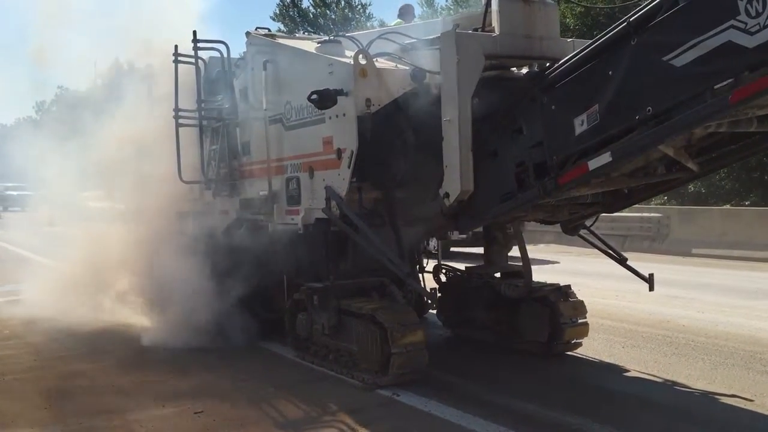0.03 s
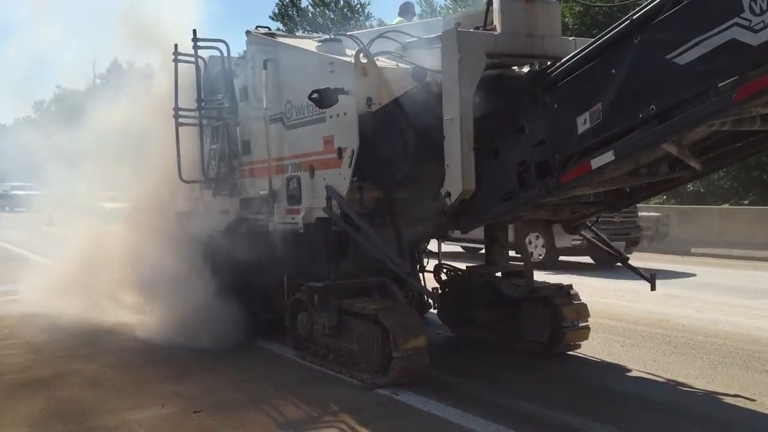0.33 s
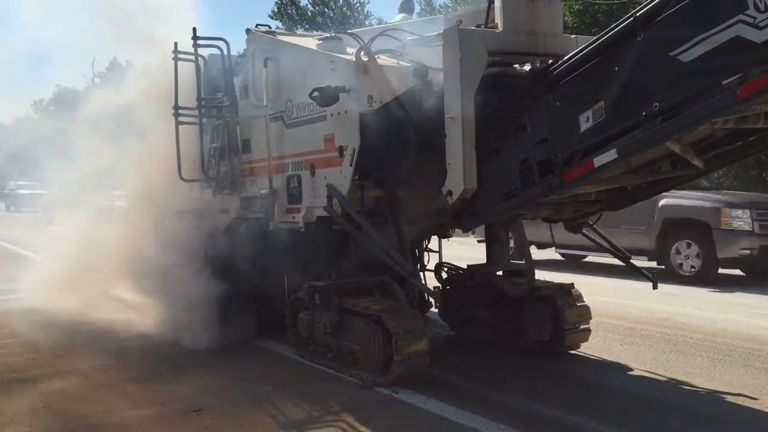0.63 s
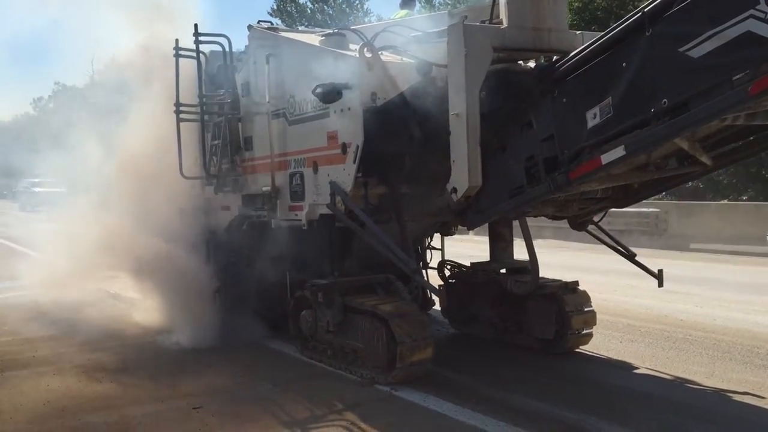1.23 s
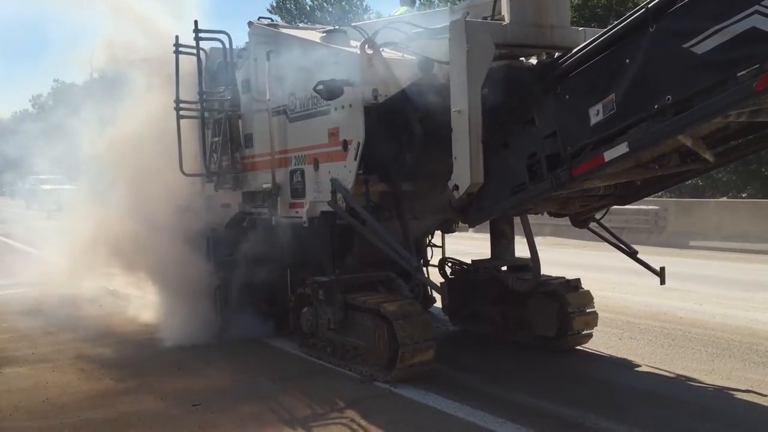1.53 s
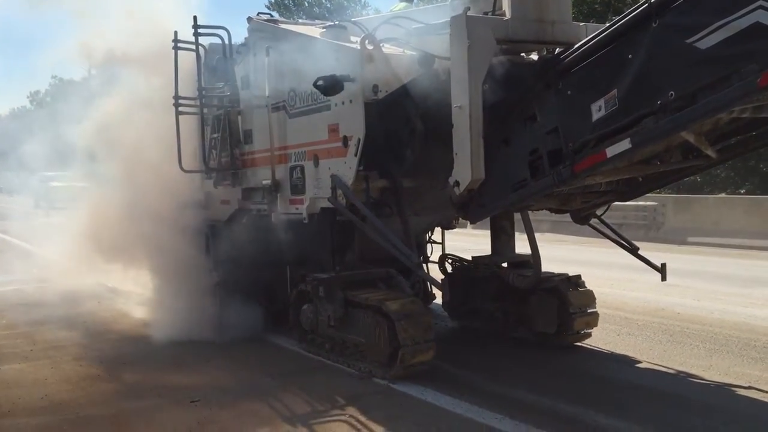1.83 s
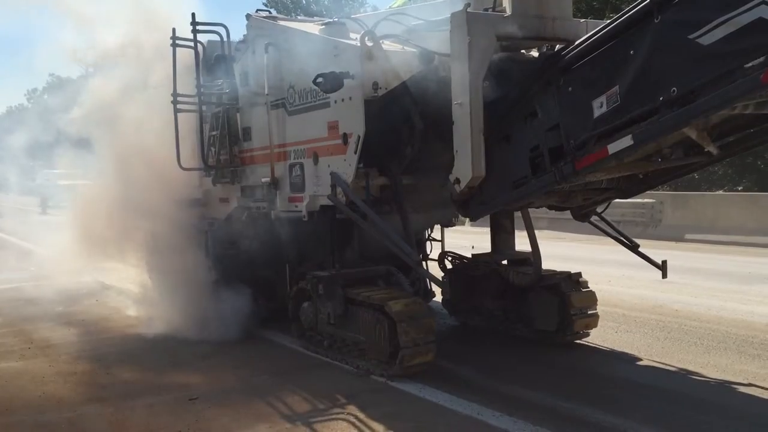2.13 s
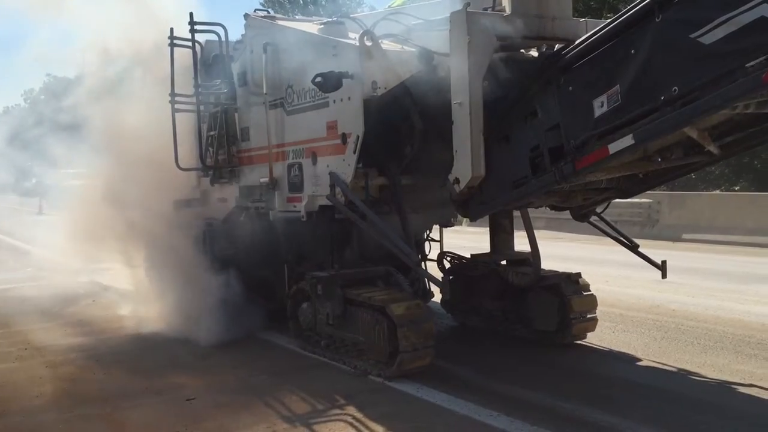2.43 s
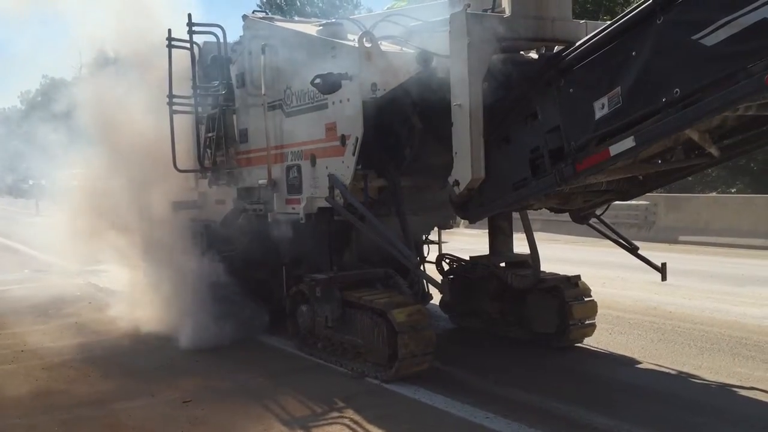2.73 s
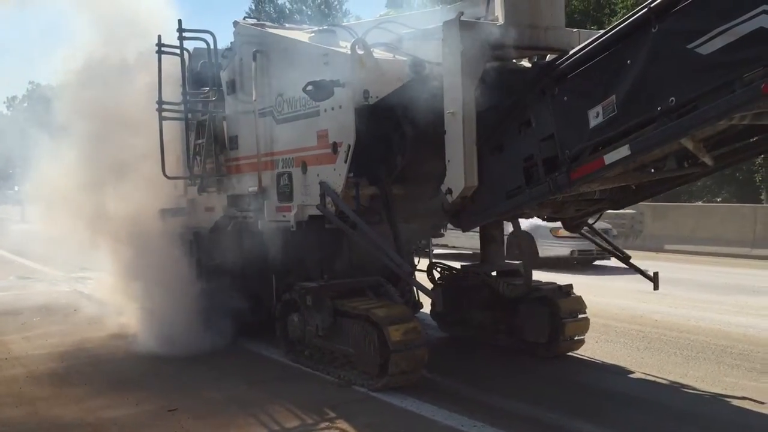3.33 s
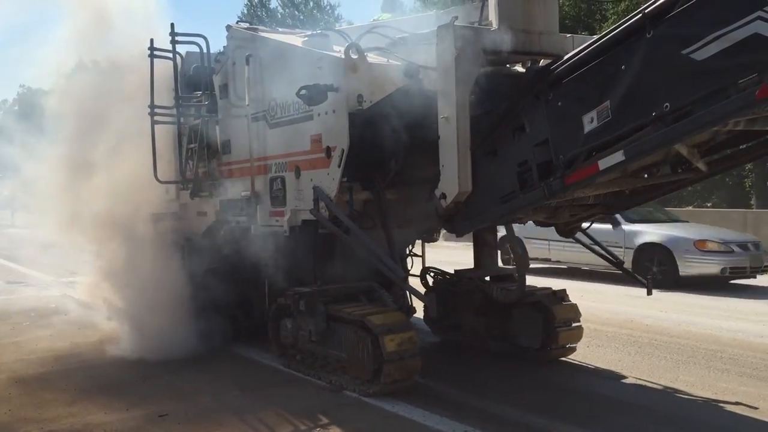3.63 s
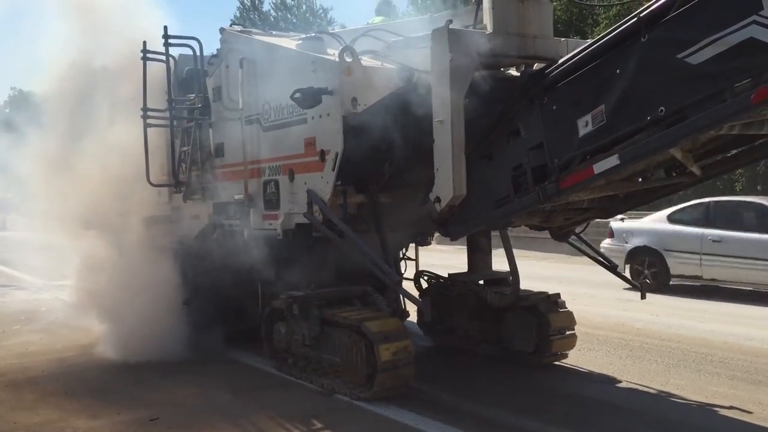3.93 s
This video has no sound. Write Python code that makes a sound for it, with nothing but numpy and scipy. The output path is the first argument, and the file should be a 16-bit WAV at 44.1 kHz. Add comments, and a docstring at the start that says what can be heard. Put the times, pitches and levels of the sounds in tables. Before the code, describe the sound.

Road milling machine rumbling and grinding nearby, with a diesel drone and rattling grit.

```python
"""On a road beside an open traffic lane, a milling machine works steadily a few metres away.
Its diesel engine and cooling fan drone through a heavy rumble. Steel picks on a spinning drum
grind the asphalt and make the drum's housing ring. Grit rattles up a conveyor belt,
the hydraulics whine faintly, and two vehicles roll past behind the machine on roaring tyres."""
import sys
import numpy as np
from scipy import signal
from scipy.fft import rfft, irfft
from scipy.io import wavfile
from scipy.ndimage import uniform_filter1d, minimum_filter1d

SR = 44100
rng = np.random.default_rng(int(sys.argv[2]) if len(sys.argv) > 2 else 0)


def log_audio(samples):
    """Write samples as a 16-bit WAV file to the path given in sys.argv[1]."""
    # one column per channel
    frames = np.atleast_2d(samples).T
    # limit to full scale, then quantise
    limited = np.clip(frames, -1, 1)
    pcm = np.round(limited * 32767).astype(np.int16)
    wavfile.write(sys.argv[1], SR, pcm)


N = 176400  # 4 seconds

# The engine's tones. Each entry: vibrations per engine cycle (two turns of the crank).
ENGINE_ORDERS = [4, 6, 7, 9, 10, 12, 14, 16, 20, 21, 22]
# Each entry: the base level of the matching tone in dB.
ENGINE_DB = [-40.5, -26.5, -37.5, -39, -39, -41, -35, -40, -41.5, -41.5, -42]
# Hums of the fan, belts and drum drive. Each entry: pitch in Hz.
HUM_PITCHES = [37.3, 48.3, 68.0, 123.5, 142.6]
# Each row: the matching hum's level in dB, its unsteadiness from 0 to 1.
HUM_LEVELS = [(-44, .1), (-38.5, 0.4), (-33.5, 0.35), (-33.5, .6), (-24.5, 0.15)]
# Pumps and gears. Each row: pitch in Hz, level in dB, pitch wander in Hz.
PUMP_WHINES = [(403, -42.5, 2.6), (1355, -50.5, 5.3), (1387, -50.5, 5.5), (2330, -50, 6.8), (2344, -54, 5)]

# How sounds rise and fall; swell() softens these curves. Each row: time in seconds, relative level in dB.
ENGINE_LOAD = [(0, -31.5), (.4, -27), (.95, -28), (1.3, -24.5), (1.7, -26), (2.7, -24), (3.0, -25),
               (3.2, -23), (3.42, -18), (3.58, -30), (3.82, -20), (4, -22)]
RUMBLE_CURVE = [(0.0, -16.5), (0.18, -19), (.36, -15), (.62, -18.5), (0.72, -18.5), (1.0, -17),
                (1.25, -19.5), (1.64, -17.5), (1.92, -18), (2.33, -18), (2.73, -18.5), (3.07, -19),
                (3.2, -16), (3.45, -25.5), (3.61, -18.5), (4.0, -21)]
SHUDDER_CURVE = [(0.0, -23.5), (0.24, -38.5), (0.6, -18), (0.88, -24.5), (1.04, -24), (1.36, -24.5),
                 (1.52, -20.5), (1.76, -21.5), (2.21, -25), (2.49, -26), (2.73, -26), (2.97, -32),
                 (3.13, -24), (3.37, -24.5), (3.77, -29), (4.0, -33)]
DRUM_BITE = [(0.0, -25), (0.12, -26.5), (0.36, -27.5), (0.96, -26.5), (1.16, -26.5), (1.36, -26.5),
             (1.48, -25.5), (1.6, -26), (1.84, -25), (1.96, -26.5), (2.09, -24.5), (2.41, -26), (2.81, -27),
             (3.01, -25), (3.41, -27.5), (3.57, -28), (3.89, -26.5), (4.0, -25)]
GRIT_CURVE = [(0.0, -36), (0.42, -35.5), (0.84, -37.5), (1.05, -36.5), (1.58, -35.5), (1.78, -37),
              (2.07, -36), (2.8, -36.5), (3.28, -36.5), (3.61, -37), (3.85, -36.5), (4.0, -36.5)]
FRAME_CURVE = [(0, -61), (.85, -62), (1.7, -59.5), (2.15, -60.5), (2.9, -60.5), (4, -59)]

# How much bass and treble each noise has. Each row: frequency in Hz, relative level in dB.
RUMBLE_COLOUR = [(30, -36.5), (84, -14), (95, 0), (122, 1), (156, 1.5), (215, -1.5), (232, -4), (255, -3.5),
                 (315, -3), (410, -5.5), (480, -13.5), (620, -28), (1200, -70.5), (4000, -110)]
SHUDDER_COLOUR = [(15, -38), (31, -25), (45, -8.5), (60, -0.5), (74, 5.5), (84, 2), (110, -19.5),
                  (200, -42), (800, -95)]
ASPHALT_COLOUR = [(200, -28), (480, -6), (580, -2.5), (680, 0.5), (800, -1.5), (960, 3), (1200, -2.5),
                  (1370, -4), (1470, -13), (1750, -10), (2100, -9), (2380, -11.5), (2650, -26.5),
                  (3300, -26.5), (4500, -44), (8000, -66), (12000, -85)]
GRIT_COLOUR = [(200, -41), (1000, -20.5), (2200, -1), (2950, 0.5), (3380, -2), (3720, -8), (4250, -5.5),
               (4600, -6.5), (4920, -11.5), (5500, -14.5), (6100, -15.5), (7500, -23.5), (9000, -29),
               (9900, -33), (10400, -38), (11050, -30), (11650, -35.5), (12100, -36), (12600, -43),
               (14300, -46.5), (15300, -48)]
PUFF_COLOUR = [(2000, -17), (7000, -1), (9500, 1), (12500, -8), (15000, -9)]

# Ringing steel. Each row: pitch in Hz, filter width in Hz, base level in dB.
HOUSING_RINGS = [(938, 66, -41.5), (1048, 155, -39.5)]
FRAME_RINGS = [(2566, 72, -57), (3613, 52, -56), (4320, 200, -62.5), (4520, 66, -63), (4580, 50, -61.5),
               (4790, 70, -65.5), (5080, 110, -63), (5360, 130, -61), (5610, 130, -60.5)]
PICK_RING = (2267, 280, -42)  # just one row

# Brief flurries. Each row: peak time in seconds, half-length in seconds, level in dB, pitch in Hz.
STONE_CRUNCHES = [(.05, 0.021, -26, 1000), (.28, .04, -28.5, 980), (.39, 0.033, -29, 990),
                  (.56, 0.043, -32.5, 1030), (1.17, 0.076, -30.5, 1060), (1.36, 0.042, -32.5, 1030),
                  (1.96, 0.03, -27.5, 980), (2.45, 0.081, -32, 1070), (3.54, .04, -29.5, 980)]
PICK_SKIDS = [(.06, .06, -38, 2320), (.25, 0.044, -37.5, 2260), (.63, .03, -38, 2280),
              (1.35, 0.13, -45, 2330), (1.8, 0.044, -40, 2270), (2.31, 0.029, -41, 2370),
              (2.96, 0.059, -41, 2370), (3.23, .08, -42, 2330), (3.795, .028, -36, 2310)]
# Vehicles. Each row: time when nearest in seconds, level in dB, half-length in seconds,
# tyre pitch in Hz, filter width in Hz.
VEHICLES = [(0.421, -32, 0.19, 570, 263), (3.62, -32.5, 0.12, 1033, 470)]

# Short swells. Each row: peak time in seconds, half-length in seconds, level in dB.
FRAME_CLATTERS = [(.35, .12, -2), (1.76, .05, 0), (2.43, .05, 0), (3.0, .09, 1), (3.35, .04, -1),
                  (3.5, .04, 2), (3.84, .05, 2)]  # level compared with the frame's steady ringing
HISS_PUFFS = [(.67, .06, -67), (1.19, .07, -73)]
DRUM_SURGES = [(.75, 0.06, -22.5), (1.22, 0.032, -24.5), (2.07, 0.029, -21), (2.35, 0.031, -18.5),
               (2.46, 0.037, -26.5), (2.65, 0.078, -23), (2.8, 0.043, -19), (3.17, 0.035, -24),
               (3.58, 0.05, -21.5)]
WHISTLE_RISES = [(1.75, 0.28, -77)]
# The drum's boom: pitch in Hz, then filter width in Hz.
DRUM_BOOM = (199, 160)
# The whistle: pitch in Hz, then pitch wander in Hz.
WHISTLE_PITCH = (8838, 14)


def amp(db):
    """Turns decibels into a number to multiply a sound by."""
    return 10 ** (np.asarray(db) / 20)


def unit(x):
    """Scales a signal so its average strength (rms) is 1."""
    return x / np.sqrt(np.mean(x ** 2) + 1e-20)


def seconds():
    """The time of each sample."""
    return np.arange(N) / SR


def swell(curve, depth):
    """A volume that follows a curve around its average; a depth below 1 shrinks the swings."""
    db = np.interp(seconds(), *np.transpose(curve))
    return amp(depth * (db - db.mean()))


def bump(peak_s, span_s, db):
    """A volume that rises smoothly to a peak and falls away again."""
    return amp(db) * np.exp(-.5 * ((seconds() - peak_s) / span_s) ** 2)


def bumps(rows):
    """The combined volume of several bumps."""
    return np.sqrt(sum(bump(*row) ** 2 for row in rows))


def drift(rate_hz):
    """A random wobble of strength 1, mostly slower than rate_hz."""
    hz = np.fft.rfftfreq(N, 1 / SR)
    spectrum = rfft(rng.standard_normal(N)) * (hz > 0)
    return unit(irfft(spectrum / (1 + (hz / rate_hz) ** 2), N))


def tone(turns):
    """A pure tone of strength 1, made from a running count of its vibrations."""
    return np.sqrt(2) * np.sin(2 * np.pi * (turns + rng.random()))


def wavering_tone(hz, wander_hz, rate_hz):
    """A tone whose pitch strays at random around hz."""
    return tone(np.cumsum(hz + wander_hz * drift(rate_hz)) / SR)


def colour(x, outline):
    """Shapes a sound's bass and treble; the result has strength 1."""
    hz, db = np.transpose(outline)
    all_hz = abs(np.fft.fftfreq(N, 1 / SR))
    log_gain = np.log(amp(np.interp(np.log(all_hz + 1), np.log(hz + 1), db)))
    response = np.exp(np.conj(signal.hilbert(log_gain)))  # rings after each hit, not before
    return unit(irfft(rfft(x) * response[:N // 2 + 1], N))


def ring(x, hz, width_hz):
    """Filters a sound twice so it rings around one pitch, at strength 1."""
    b, a = signal.iirpeak(hz, hz / width_hz, SR)
    return unit(signal.lfilter(b, a, signal.lfilter(b, a, x)))


def impacts(per_s, spread_db, share):
    """Uneven random hits carry this share of the power; the rest is a wash of tiny ones."""
    sizes = amp(spread_db * np.minimum(rng.exponential(1, N), 4))
    hits = sizes * rng.choice([-1, 1], N) * (rng.random(N) < per_s / SR)
    return np.sqrt(share) * unit(hits) + np.sqrt(1 - share) * rng.standard_normal(N)


def engine(crank_hz=36.49, flutter=0.64):
    """A six-cylinder diesel fires with a firm tone among weaker, shakier ones."""
    crank_speed = crank_hz + 0.02 * drift(0.86)
    cycles = np.cumsum(crank_speed) / SR / 2
    out = np.zeros(N)
    for order, db in zip(ENGINE_ORDERS, ENGINE_DB):
        shakiness = flutter * amp((min(ENGINE_DB) - db) / 2)
        steady = tone(order * cycles)
        shaky = shakiness * drift(1.45) * tone(order * cycles)
        out += amp(db) * (steady + shaky)
    return out * swell(ENGINE_LOAD, depth=0.75)


def drives():
    """The fan, belts and drum drive hum as they spin, each wavering a little."""
    out = np.zeros(N)
    for hz, (db, unsteadiness) in zip(HUM_PITCHES, HUM_LEVELS):
        volume = amp(db) * unit(1 + unsteadiness * drift(3.6))
        out += volume * wavering_tone(hz, wander_hz=0.27, rate_hz=1.3)
    return out


def pumps(flutter=0.8):
    """Hydraulic pumps and gears give thin, fuzzy whines."""
    out = np.zeros(N)
    for hz, db, wander_hz in PUMP_WHINES:
        volume = amp(db) * unit(1 + flutter * drift(2.2))
        out += volume * wavering_tone(hz, wander_hz, rate_hz=14.7)
    return out


def rumble(drum_db=-21, chassis_db=-29):
    """Cutting shakes the drum, and the machine's chassis shudders deeper still."""
    drum = amp(drum_db) * colour(rng.standard_normal(N), RUMBLE_COLOUR)
    chassis = amp(chassis_db) * colour(rng.standard_normal(N), SHUDDER_COLOUR)
    return drum * swell(RUMBLE_CURVE, depth=0.84) + chassis * swell(SHUDDER_CURVE, depth=0.6)


def pick_hits():
    """The drum's steel picks strike the road in a dense stream."""
    return impacts(per_s=1800, spread_db=3, share=0.38)


def grinding(rows_per_s=76.6, asphalt_db=-27.5):
    """Row after row of picks chips the asphalt and rings the steel housing."""
    pulse = 1 + 0.047 * wavering_tone(rows_per_s, wander_hz=0.39, rate_hz=1.2)
    asphalt = amp(asphalt_db) * colour(pick_hits() * pulse, ASPHALT_COLOUR)
    blows = pick_hits() * pulse
    housing = sum(amp(db) * ring(blows, hz, width) for hz, width, db in HOUSING_RINGS)
    return asphalt * swell(DRUM_BITE, depth=0.81) + housing * swell(DRUM_BITE, depth=0.82)


def scrape():
    """The picks rasp steadily on stone."""
    hz, width, db = PICK_RING
    return amp(db) * ring(pick_hits(), hz, width)


def conveyor(grit_db=-39, flicker_db=0.53):
    """Crushed stone patters onto the belt and rings its steel frame, at times with a clatter."""
    stones, knocks = (impacts(per_s=2200, spread_db=0.5, share=0.26) for _ in range(2))
    grit = amp(grit_db) * colour(stones, GRIT_COLOUR)
    frame = sum(amp(db) * ring(knocks, hz, width) for hz, width, db in FRAME_RINGS)
    frame *= swell(FRAME_CURVE, depth=0.8) * np.hypot(1, bumps(FRAME_CLATTERS))
    flicker = amp(flicker_db * drift(21))
    return (grit + frame) * flicker * swell(GRIT_CURVE, depth=0.98)


def flurries(rows, width_hz):
    """Short bursts of pick hits, each ringing at its own pitch."""
    hits = pick_hits()
    return sum(bump(peak_s, span_s, db) * ring(hits, hz, width_hz) for peak_s, span_s, db, hz in rows)


def crunches():
    """Hard stones crunch inside the housing."""
    return flurries(STONE_CRUNCHES, width_hz=450)


def skids():
    """Picks skid on hard stone with a short, high rasp."""
    return flurries(PICK_SKIDS, width_hz=190)


def traffic():
    """Tyre roar grows and fades as each vehicle passes."""
    out = np.zeros(N)
    for nearest_s, db, span_s, hz, width in VEHICLES:
        volume = amp(db) / (1 + ((seconds() - nearest_s) / span_s) ** 2)
        out += volume * ring(rng.standard_normal(N), hz, width)
    return out


def puffs():
    """Two faint puffs of fine hiss."""
    return bumps(HISS_PUFFS) * colour(rng.standard_normal(N), PUFF_COLOUR)


def booms():
    """The drum booms each time it tears out a slab."""
    return bumps(DRUM_SURGES) * ring(rng.standard_normal(N), *DRUM_BOOM)


def whistle():
    """A faint, high whistle comes and goes once."""
    return bumps(WHISTLE_RISES) * wavering_tone(*WHISTLE_PITCH, rate_hz=25)


def scene():
    """Adds the constant sounds and the brief ones into one channel."""
    constant = engine() + drives() + pumps() + rumble() + grinding() + scrape() + conveyor()
    brief = crunches() + skids() + traffic() + puffs() + booms() + whistle()
    return (constant + brief)[None]


def record(dry):
    """Smoothly turns down the tallest peaks, then cuts the highest treble."""
    ceiling_db, smooth_s, cutoff_hz = -5.5, 0.008, 15250
    span = int(smooth_s * SR)
    gain = np.minimum(1, amp(ceiling_db) / (abs(dry[0]) + 1e-9))
    gain = minimum_filter1d(gain, 2 * span)  # stay low on both sides of a peak
    gain = uniform_filter1d(uniform_filter1d(gain, span), span)
    treble_cut = signal.firwin(511, cutoff_hz, window=("kaiser", 9), fs=SR)
    return signal.oaconvolve(dry * gain, treble_cut[None], "same")


dry = scene()
out = record(dry)
log_audio(out)
```